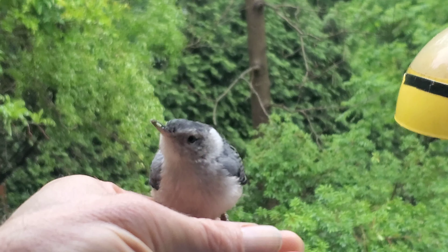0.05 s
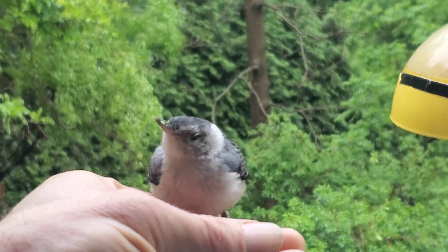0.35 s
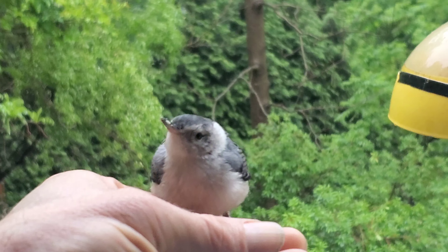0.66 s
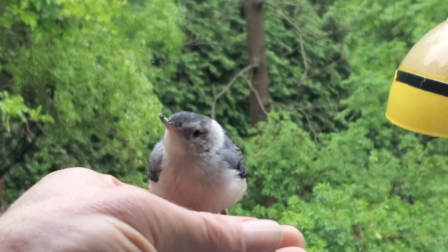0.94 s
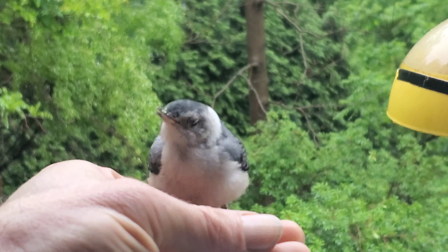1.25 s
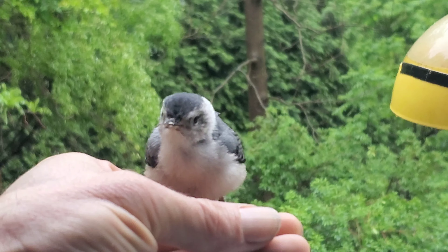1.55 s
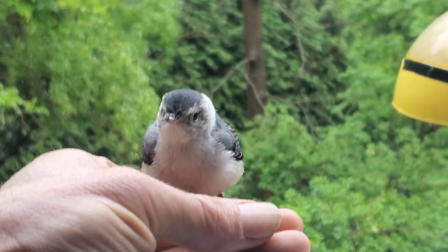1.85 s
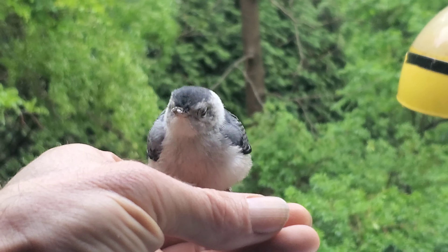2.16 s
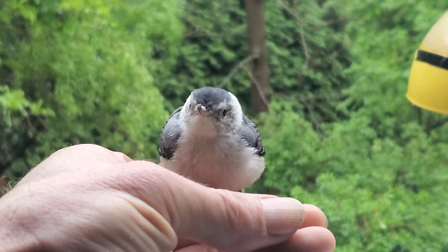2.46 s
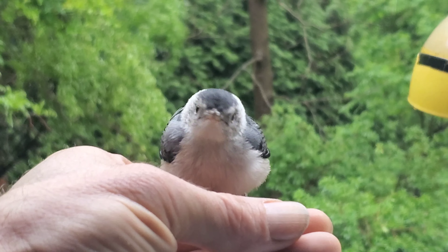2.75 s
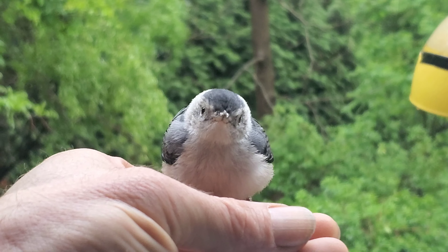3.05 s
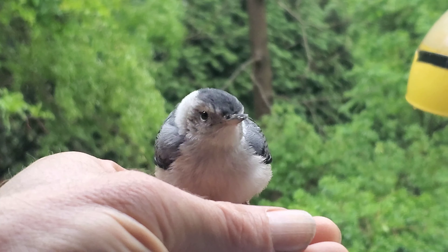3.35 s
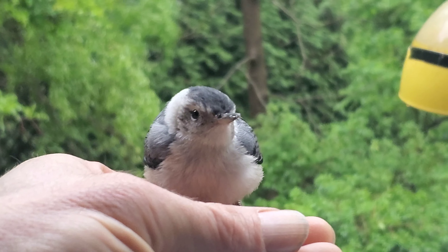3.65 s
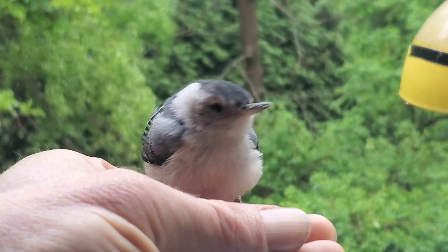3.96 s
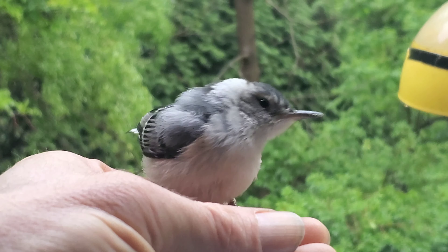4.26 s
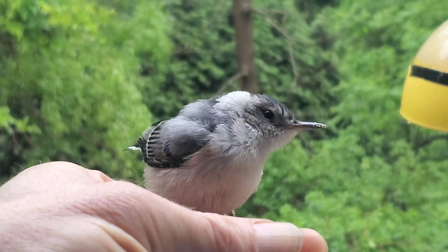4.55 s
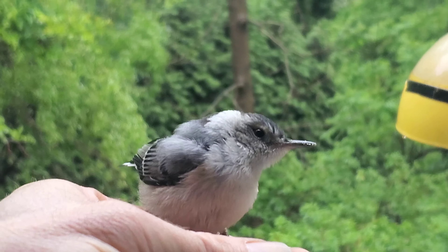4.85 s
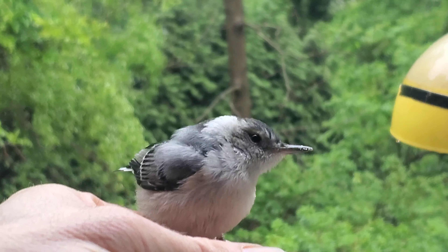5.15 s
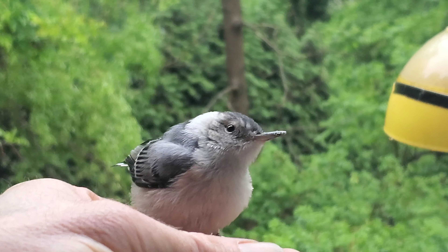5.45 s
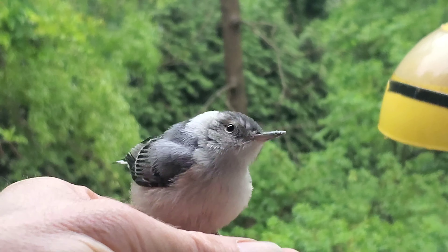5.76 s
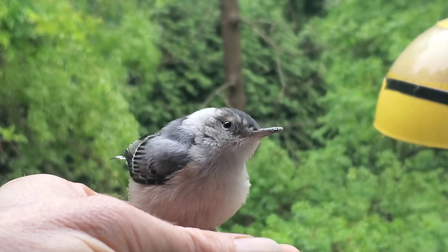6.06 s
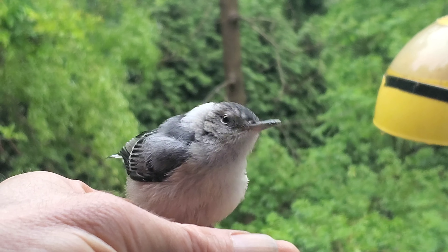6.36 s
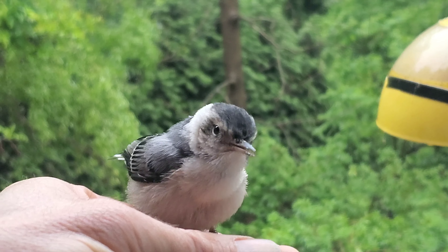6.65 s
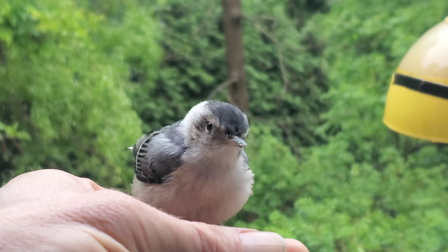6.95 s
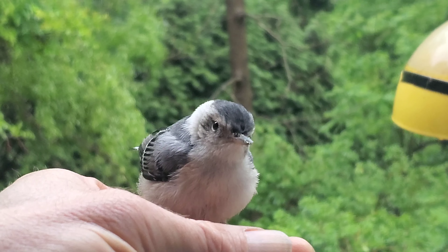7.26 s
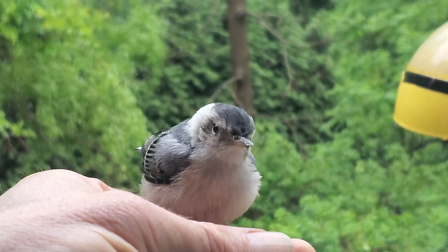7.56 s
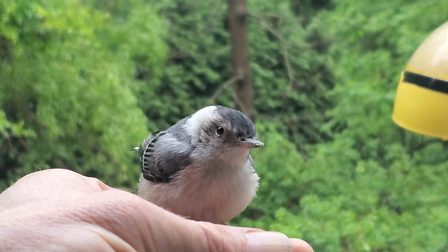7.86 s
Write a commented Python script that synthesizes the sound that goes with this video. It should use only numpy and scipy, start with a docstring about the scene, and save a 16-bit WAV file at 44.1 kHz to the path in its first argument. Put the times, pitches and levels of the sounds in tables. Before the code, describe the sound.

In a garden, a nuthatch close to stereo microphones gives a short, nasal, quavering call that sinks and breaks into a rasp. A quiet low rumble with soft wind buffets, a faint electric hum and airy hiss continue underneath, with a few thin, very high whistles. A distant engine slowly revs up, something rustles softly, and the bird calls a second time, about five seconds after the first.

```python
"""A garden, stereo microphones close to a nuthatch perched on a hand. From the start: an electric hum,
a low rumble with soft wind buffets, airy hiss and a few thin, very high whistles. At 1.3 s the bird gives
a nasal, quavering call, its syrinx buzzing through throat and open beak: clear, then sinking and breaking
into a rasp. A far engine revs up slowly, something rustles softly, and at 6.6 s comes a second call."""
import sys
import numpy as np
from scipy import signal
from scipy.fft import rfft, irfft, next_fast_len
from scipy.io import wavfile
from scipy.ndimage import uniform_filter1d

SR = 44100
rng = np.random.default_rng(int(sys.argv[2]) if len(sys.argv) > 2 else 0)


def log_audio(samples):
    """Write samples as a 16-bit WAV file to the path given in sys.argv[1]."""
    # one column per channel
    frames = np.atleast_2d(samples).T
    # limit to full scale, then quantise
    limited = np.clip(frames, -1, 1)
    pcm = np.round(limited * 32767).astype(np.int16)
    wavfile.write(sys.argv[1], SR, pcm)


N = 353108
TIME = np.arange(N) / SR

# colours of the noises around the microphones: f/Hz, relative level/dB
RUMBLE_SPECTRUM = [(18, -12), (33, -4), (44, -7), (60, 1.5), (80, -2.5), (100, -4), (130, -5), (175, -13),
                   (210, -6), (260, -10.5), (340, -17), (600, -33)]
AIR_SPECTRUM = [(150, -17), (330, -7.5), (480, -0.5), (700, -5), (1000, -4), (1400, -2), (1650, -3),
                (1900, -0.5), (2300, -9), (3100, -8.5), (4500, -16.5), (8000, -33.5)]
HISS_SPECTRUM = [(2000, -25), (3500, -2), (5500, -1), (7800, -2.5), (9200, -8), (10500, -7), (11900, -3),
                 (13000, -7), (14400, -5.5), (15800, -11)]
RUSTLE_SPECTRUM = [(3500, -20), (4800, 3), (8000, -4), (12500, -2), (15000, -16)]
# how alike those noises are left and right: f/Hz, correlation
STEREO_LIKENESS = [(60, 1), (92, 0.94), (140, 1), (210, 0.9), (330, 0.78), (500, 0.79), (770, 0.53),
                   (1170, -0.32), (1790, -0.16), (2740, 0.075), (4190, -0.073), (6410, 0.031),
                   (9810, 0.032), (15000, -0.021)]
# soft wind buffets and lulls in the low rumble: t/s, half-width/s, change/dB
WIND_BUFFETS = [(0.38, 0.064, 3), (2.25, 0.12, 2.5), (4.33, 0.057, 1), (4.66, 0.1, 0), (6.15, 0.35, 1),
                (7.64, 0.054, 2.5), (7.8, 0.091, -3)]
# swells of the hiss, and a lull in the whole background: t/s, half-width/s, change/dB
HISS_SURGES = [(0.5, 0.5, 0.5), (2.1, 0.064, 1), (2.6, 0.55, 2.5)]
BACKGROUND_LULLS = [(7.7, 0.61, -1.2)]
# a far engine's revs: t/s, firing rate/Hz, level/dB
ENGINE_REVS = [(0, 58, -57), (2.4, 71.95, -54), (3.4, 66.5, -66), (5.5, 78.4, -50.5), (6.3, 84.5, -53.5),
               (7, 85, -66), (8, 80, -58)]
# high whistles: start/s, length/s, f at the ends/Hz, f at the top/Hz, level/dB
WHISTLE_ARCHES = [(0.05, 0.92, 13100, 16500, -65), (1.1, 0.21, 11650, 12600, -61),
                  (4.15, 0.42, 13100, 15900, -65), (7.188, 0.51, 12300, 15600, -63)]
# the rustle at its loudest: t/s, level/dB
RUSTLE_PEAKS = [(6.390, -46)]

# the calls: start/s, length/s, level/dB, pitch at full effort/Hz, pitch at no effort/Hz,
# effort half-width/s, opening scoop/share of pitch, first quaver crest/s, voice break/s (both from the
# call's start), release/s, fatigue factor
CALLS = [(1.289, 0.273, -16.5, 918, 734, 0.087, -0.0166, 0.0085, 0.15, 0.013, 1.05),
         (6.578, 0.2748, -15, 890, 750.6, 0.092, 0.14, 0.00976, 0.106, 0.021, 0.447)]
# the voice in each call: undertone/dB, rasp/dB, roughening/(1/s), sizzle/dB, sizzle tilt/(dB/octave),
# beak resonance/Hz, voice fed to it/dB, rasp fed to it/dB
CALL_VOICES = [(-13.5, 8, 2.7, -26.5, 13, 3090, -1, 15), (-21.5, -2, 6.3, -20.2, 8, 3400, -6, 18)]
# throat and open beak in each call: f/Hz, gain/dB
FIRST_TRACT = [(450, -46), (720, -14.5), (920, -17.5), (1080, -9), (1450, 1.5), (1800, -5.5), (2250, -3.5),
               (2750, 0), (3120, -5), (3500, -9), (3900, -25), (4300, -30), (6500, -49)]
SECOND_TRACT = [(450, -35), (720, -14), (900, -18), (1030, -10), (1250, -0.5), (1500, -0.5), (1780, -2),
                (2180, -5.5), (2650, -1.5), (2950, 3), (3500, -12.5), (3900, -22.5), (4300, -33),
                (6500, -50)]
# a faint, very high sizzle that follows the call's loudness, before its tilt: f/Hz, relative level/dB
SIZZLE_SPECTRUM = [(7000, -12), (10000, -16), (11000, -4), (11700, 4), (12800, -16), (14300, -4),
                   (15800, -16)]
# each call at the two microphone ports: f/Hz, left lead/rad, left minus right/dB
FIRST_MIC_PATH = [(300, 0.25, 0), (800, 0.73, 0.5), (1290, 1.7, -4), (1810, 2.73, 2), (2140, 1.35, 4),
                  (2700, 1.98, 4), (3380, 2.3, -0.5)]
SECOND_MIC_PATH = [(300, 0.25, -2), (800, 0.46, -2), (1250, 1.4, -5), (1650, 2.6, 0.5), (2170, 1.55, 7.5),
                   (2900, 0.96, 2), (3500, 2.08, -2.5)]

HUM_HZ, HUM_DB = 122.7, -57.5
RUMBLE_DB, AIR_DB, HISS_DB = -48.5, -45, -50
GARDEN_T60_S, GARDEN_DB = 0.1, -12.5
# effort is one flat-topped arch (a higher power is flatter); as it falls the bird tires
EFFORT_PEAK_S, EFFORT_POWER, TIRES_AFTER_S = 0.064, 2.6, 0.131
ATTACK_S, FADE_DB_PER_S = 0.014, 53
# the quaver slows, widens and throbs harder; these changes and the fade scale with fatigue
QUAVER_HZ, QUAVER_SLOWING_HZ_PER_S = 45.54, 165
QUAVER_DEPTH, TIRED_QUAVER_DEPTH = 0.022, 0.093
THROB_DB, THROB_DB_PER_S = 0.56, 32
# roughness (0-1) settles after the onset and returns as the bird tires
ONSET_ROUGH, SETTLE_S, CLEAR_ROUGH = 1, 0.014, 0.035
# at full roughness: pitch jitter, slip of each partial, added undertone
JITTER, FLUTTER_RADIANS, ROUGH_UNDERTONE = 0.019, 0.73, 0.58
# the voice breaks suddenly: rougher, weaker and lower (by a share of the pitch)
BREAK_S, BREAK_ROUGH, BREAK_DROP_DB, BREAK_PITCH_DROP = 0.0014, 0.28, 2, 0.035


def from_db(db):
    """Decibels to gain."""
    return 10 ** (np.asarray(db) / 20)


def unit_rms(x):
    """Scale to unit rms."""
    return x / np.sqrt(np.mean(x ** 2) + 1e-20)


def at_hz(points, hz):
    """Read a spectrum on a log-frequency axis."""
    f, value = np.transpose(points)
    return np.interp(np.log(hz + 1e-3), np.log(f), value)


def shaped(x, gain):
    """Filter by a gain that is a function of frequency."""
    size = next_fast_len(x.shape[-1])
    hz = np.arange(size // 2 + 1) * SR / size
    return irfft(rfft(x, size) * gain(hz), size)[..., :x.shape[-1]]


def coloured(x, spectrum):
    """Filter by a spectrum table, falling 40 dB in the octave past each end."""
    (low_hz, low_db), (high_hz, high_db) = spectrum[0], spectrum[-1]
    closed = [(low_hz / 2, low_db - 40), *spectrum, (high_hz * 2, high_db - 40)]
    return shaped(x, lambda hz: from_db(at_hz(closed, hz)))


def ringing(x, spectrum, size=4096):
    """Minimum-phase filter: each peak rings on after the pulse that feeds it."""
    hz = np.arange(size // 2 + 1) * SR / size
    cepstrum = irfft(np.log(from_db(at_hz(spectrum, hz))))
    causal = np.r_[cepstrum[0], 2 * cepstrum[1:size // 2]]
    impulse = irfft(np.exp(rfft(causal, size)))
    return signal.fftconvolve(x, impulse)[:len(x)]


def wander(rate_hz, size=N):
    """Random motion up to about the given rate; rms 1."""
    return unit_rms(shaped(rng.standard_normal(size), lambda hz: 1 / (1 + (hz / rate_hz) ** 2)))


def ramps(t, length_s, attack_s, release_s):
    """Rise, hold and fall in straight lines; silent outside."""
    return np.clip(np.minimum(t / attack_s, (length_s - t) / release_s), 0, 1)


def swells(rows):
    """Bell-shaped changes of level, in dB."""
    return sum(change_db * np.exp(-((TIME - s) / width_s) ** 2) for s, width_s, change_db in rows)


def ambience(spectrum):
    """Noise from all around the microphones: alike in the bass, unrelated in the treble; rms 1."""
    def likeness(hz):
        return np.clip(at_hz(STEREO_LIKENESS, hz), -.99, .99)

    mid = shaped(rng.standard_normal(N), lambda hz: np.sqrt(1 + likeness(hz)))
    side = shaped(rng.standard_normal(N), lambda hz: np.sqrt(1 - likeness(hz)))
    return unit_rms(coloured(np.array([mid + side, mid - side]), spectrum))


def low_rumble():
    """A low rumble, with soft wind buffets on the microphones and lulls."""
    return from_db(RUMBLE_DB + swells(WIND_BUFFETS)) * ambience(RUMBLE_SPECTRUM)


def open_air():
    """Steady midrange air on all sides, under a hiss that wavers and swells."""
    air = from_db(AIR_DB) * ambience(AIR_SPECTRUM)
    hiss_db = HISS_DB + swells(HISS_SURGES) + 0.45 * wander(8)
    return air + from_db(hiss_db) * ambience(HISS_SPECTRUM)


def far_engine():
    """An engine in distant traffic: its unsteady firing tone climbs slowly and drops away, twice."""
    times, rates, levels = np.transpose(ENGINE_REVS)
    level_db = np.interp(TIME, times, levels) + 3.4 * wander(4.7)
    firing_hz = np.interp(TIME, times, rates) + 1.04 * wander(2.76)
    return np.sqrt(2) * from_db(level_db) * np.sin(2 * np.pi * np.cumsum(firing_hz) / SR)


def electric_hum():
    """One low, nearly steady tone, the same in both microphones."""
    return np.sqrt(2) * from_db(HUM_DB + 0.57 * wander(4.9)) * np.sin(2 * np.pi * HUM_HZ * TIME)


def whistles(fade_s=0.025, flicker_db=4):
    """Faint, unsteady glides at the top of hearing; each rises and falls back."""
    out = np.zeros(N)
    waver = 1 + 0.0032 * wander(150) + 0.007 * wander(12)
    for start_s, length_s, end_hz, top_hz, level_db in WHISTLE_ARCHES:
        t = TIME - start_s
        hz = end_hz + (top_hz - end_hz) * np.sin(np.pi * t / length_s)
        tone = np.sin(2 * np.pi * np.cumsum(hz * waver) / SR)
        out += from_db(level_db) * ramps(t, length_s, fade_s, fade_s) * tone
    return out * from_db(flicker_db * wander(14))


def rustle(attack_s=0.025, release_s=0.11):
    """A soft brush of high noise just before the second call."""
    envelope = sum(from_db(db) * ramps(TIME - s + attack_s, attack_s + release_s, attack_s, release_s)
                   for s, db in RUSTLE_PEAKS)
    return envelope * ambience(RUSTLE_SPECTRUM)


def garden_scatter(x, gap_s=0.004):
    """Short, faint reflections from nearby walls and leaves."""
    t = TIME[:SR // 2]
    scatter = rng.standard_normal((2, len(t))) * from_db(-60 * t / GARDEN_T60_S) * (t > gap_s)
    scatter /= np.sqrt(np.sum(scatter ** 2, axis=1, keepdims=True))
    return from_db(GARDEN_DB) * signal.fftconvolve(x, scatter, axes=1)[:, :N]


def at_microphones(x, path):
    """The bird is nearer the left port; the casing delays and shades the two ports differently by band."""
    path = np.array(path)
    lead, balance = path[:, [0, 1]], path[:, [0, 2]]

    def left_gain(hz):
        return from_db(at_hz(balance, hz) / 2) * np.exp(.5j * at_hz(lead, hz))

    return np.array([shaped(x, left_gain), shaped(x, lambda hz: 1 / left_gain(hz))])


def gesture(t, length_s, level_db, top_hz, low_hz, width_s, scoop, crest_s, break_s, release_s,
            fatigue, roughening):
    """Pitch, loudness and roughness: an arch of effort with a quaver; on the way down the voice breaks."""
    effort = np.exp(-np.abs((t - EFFORT_PEAK_S) / width_s) ** EFFORT_POWER)
    tired_s = np.maximum(t - TIRES_AFTER_S, 0)
    opening = np.exp(-t / ATTACK_S)
    broken = .5 + .5 * np.tanh((t - break_s) / BREAK_S)
    lost_cycles = fatigue * QUAVER_SLOWING_HZ_PER_S * tired_s ** 2 / 2
    quaver = np.cos(2 * np.pi * (QUAVER_HZ * (t - crest_s) - lost_cycles))
    depth = QUAVER_DEPTH + fatigue * TIRED_QUAVER_DEPTH * (1 - effort)
    arch_hz = low_hz + (top_hz - low_hz) * effort
    pitch = arch_hz * (1 - scoop * opening - BREAK_PITCH_DROP * broken + depth * quaver)
    loss_db = BREAK_DROP_DB * broken + FADE_DB_PER_S * fatigue * tired_s
    throb_db = (THROB_DB + THROB_DB_PER_S * fatigue * tired_s) * quaver
    edges = (1 - opening) * np.clip((length_s - t) / release_s, 0, 1)
    loudness = from_db(level_db - loss_db + throb_db) * edges ** 2
    rough = CLEAR_ROUGH + ONSET_ROUGH * np.exp(-t / SETTLE_S) + BREAK_ROUGH * broken + roughening * tired_s
    return pitch, loudness, np.clip(rough, 0, 1)


def syrinx(pitch, rough, undertone_db):
    """The buzz and its puffs of noise, one a cycle; roughness shakes the partials out of step."""
    size = len(pitch)
    phase = 2 * np.pi * np.cumsum(pitch * (1 + JITTER * rough * wander(250, size))) / SR

    def partial(k):
        slip = FLUTTER_RADIANS * rough * wander(270, size)
        swell = from_db((1 + 2 * rough) * wander(60, size))
        # upper partials lag, so a cycle is a short sweep rather than a click
        return swell * np.cos(k * phase - k * k / 2 + slip)

    harmonics = sum(partial(k) for k in range(1, 8))
    # alternate strong and weak cycles put partials halfway between the harmonics
    undertones = sum(partial(k + .5) * min(k / 2, 1) ** 2 for k in range(1, 5))
    buzz = harmonics + (from_db(undertone_db) + ROUGH_UNDERTONE * rough) * undertones
    puffs = (1 + 0.57 * np.cos(phase)) * rng.standard_normal(size)
    return buzz, puffs


def call(row, voicing, tract, beak_width_hz=79):
    """One call: the syrinx rings the throat and beak; a faint, very high sizzle follows its loudness."""
    start_s, length_s, *shape = row
    undertone_db, rasp_db, roughening, sizzle_db, tilt_db, beak_hz, beak_db, beak_rasp_db = voicing
    span = (TIME >= start_s) & (TIME < start_s + length_s)
    t = TIME[span] - start_s
    pitch, loudness, rough = gesture(t, length_s, *shape, roughening)
    buzz, puffs = syrinx(pitch, rough, undertone_db)
    voice = ringing(buzz + from_db(rasp_db) * rough * puffs, tract)
    # the narrow beak resonance holds its note while the pitch falls past it
    rasp = ringing(rng.standard_normal(len(t)), tract)
    drive = from_db(beak_db) * voice + from_db(beak_rasp_db) * rough * rasp
    voice += signal.lfilter(*signal.iirpeak(beak_hz, beak_hz / beak_width_hz, fs=SR), drive)
    voice /= np.sqrt(uniform_filter1d(voice ** 2, size=300) + 1e-12)  # the gesture alone sets the level
    sizzle = unit_rms(coloured(puffs, [(hz, db + tilt_db * np.log2(hz)) for hz, db in SIZZLE_SPECTRUM]))
    # the sizzle needs a loud, clear voice
    sizzle *= from_db(sizzle_db) * (1 - 0.66 * rough) * np.sqrt(loudness / loudness.max())
    out = np.zeros(N)
    out[span] = loudness * (voice + sizzle)
    return out


def nuthatch():
    """Two calls close to the microphones, with the head turned differently for each."""
    calls = zip(CALLS, CALL_VOICES, (FIRST_TRACT, SECOND_TRACT), (FIRST_MIC_PATH, SECOND_MIC_PATH))
    direct = sum(at_microphones(call(row, voicing, tract), path) for row, voicing, tract, path in calls)
    return direct + garden_scatter(direct)


def scene():
    """The bird up close, the garden behind it easing a little at the end."""
    bird = nuthatch()
    background = low_rumble() + open_air() + far_engine() + electric_hum()
    return from_db(swells(BACKGROUND_LULLS)) * background + whistles() + rustle() + bird


def gain_control(x, threshold_db=-28.5, share=0.18, attack_s=0.073, recovery_db_per_s=3):
    """The recorder takes off a share of the level above its threshold; the gain creeps back afterwards."""
    power = uniform_filter1d(np.mean(x ** 2, axis=0), size=882)  # over 20 ms
    excess_db = np.maximum(10 * np.log10(np.abs(power) + 1e-12) - threshold_db, 0)
    recovery = recovery_db_per_s * TIME
    cut_db = np.maximum.accumulate(share * excess_db + recovery) - recovery
    pole = np.exp(-1 / (attack_s * SR))
    return x * from_db(-signal.lfilter([1 - pole], [1, -pole], cut_db))


def record(dry):
    """Behind the microphones: gain control, then a steep low-pass at 15850 Hz."""
    lowpass = signal.ellip(12, .1, 90, 15850, fs=SR, output="sos")
    return signal.sosfilt(lowpass, gain_control(dry))


dry = scene()
out = record(dry)
log_audio(out)
```